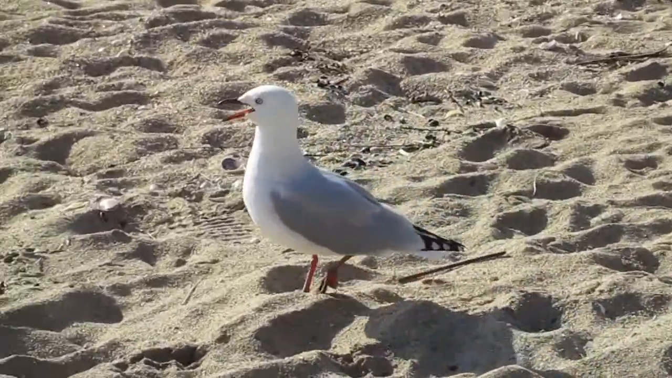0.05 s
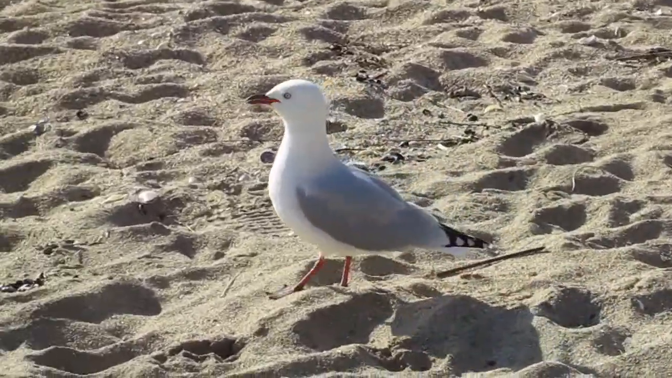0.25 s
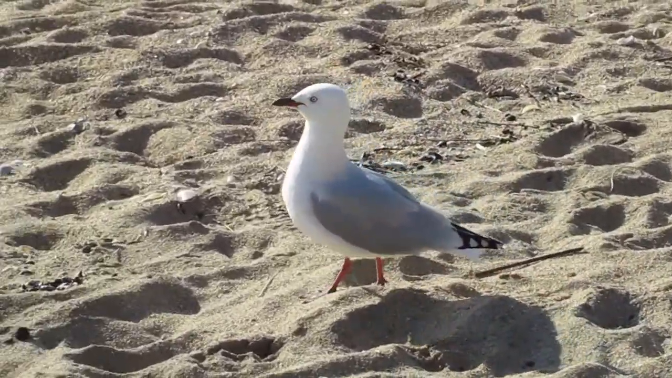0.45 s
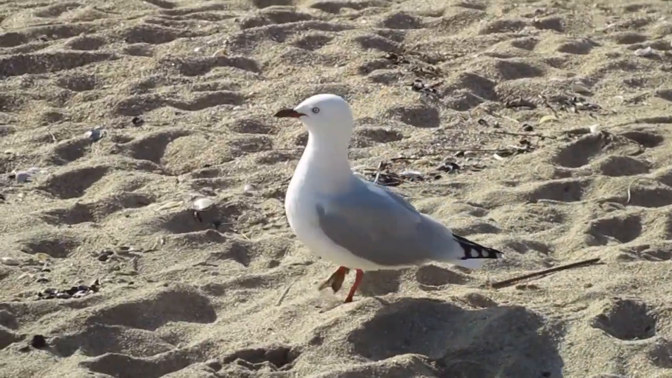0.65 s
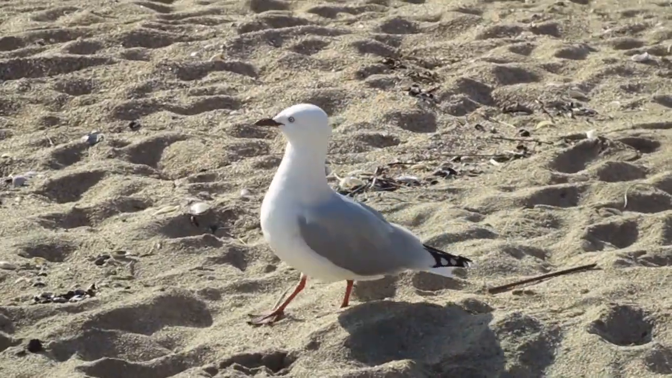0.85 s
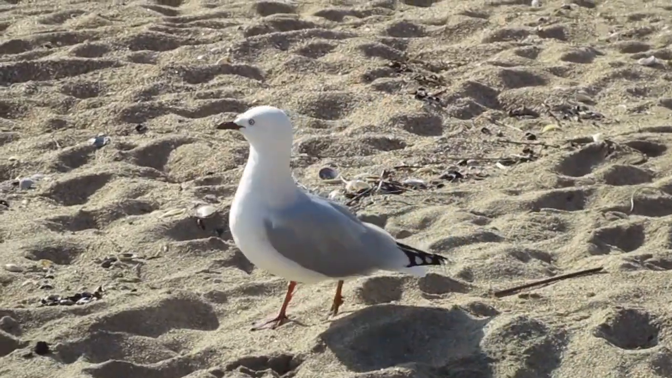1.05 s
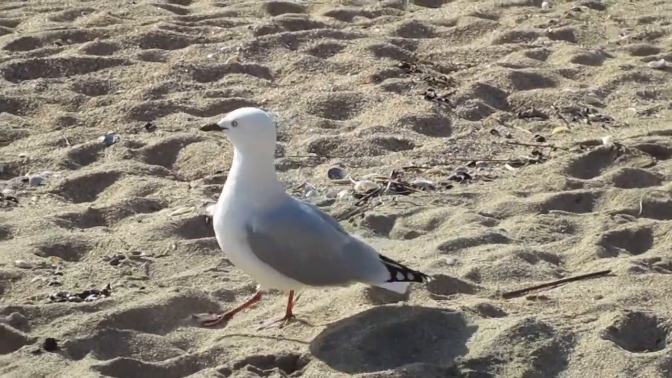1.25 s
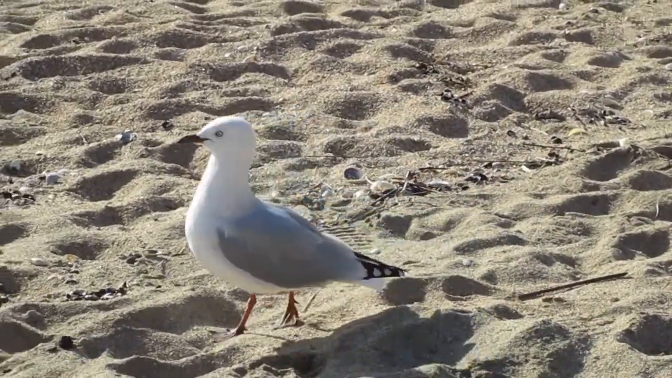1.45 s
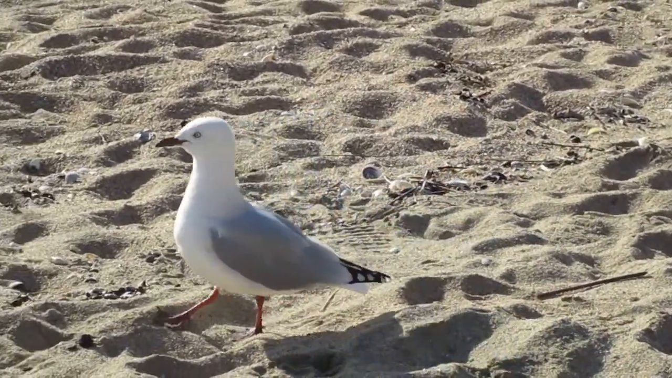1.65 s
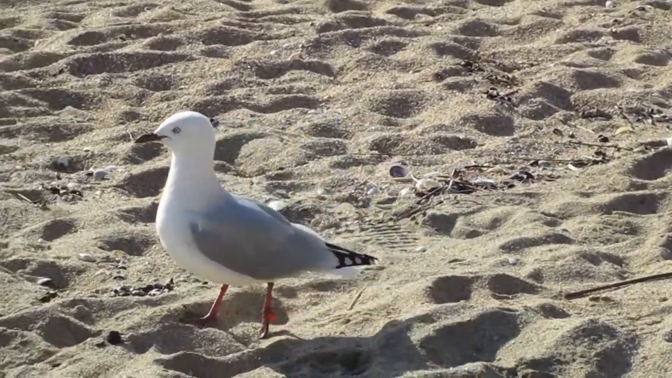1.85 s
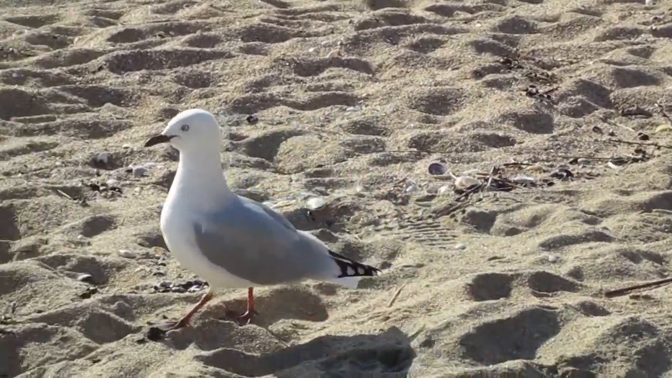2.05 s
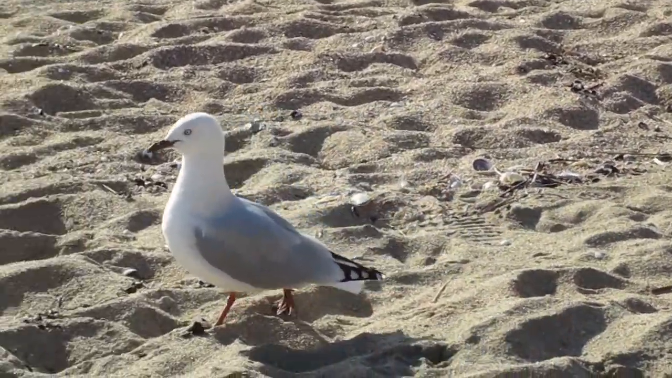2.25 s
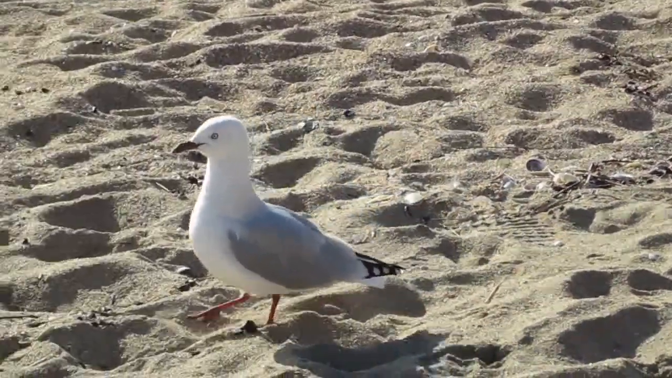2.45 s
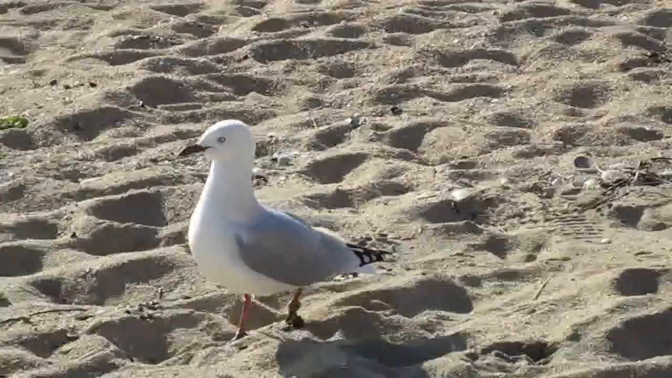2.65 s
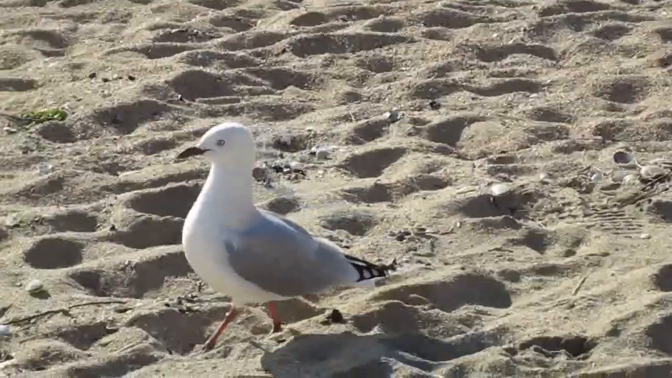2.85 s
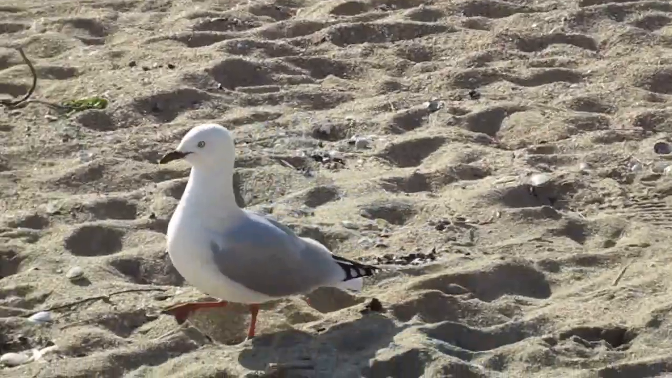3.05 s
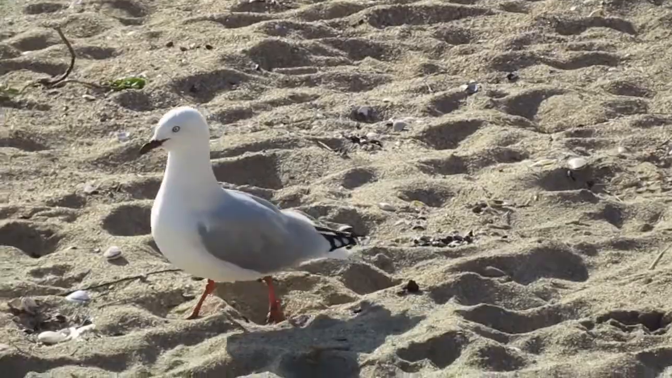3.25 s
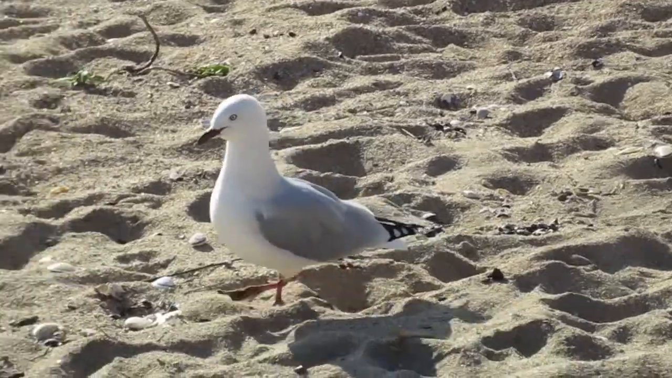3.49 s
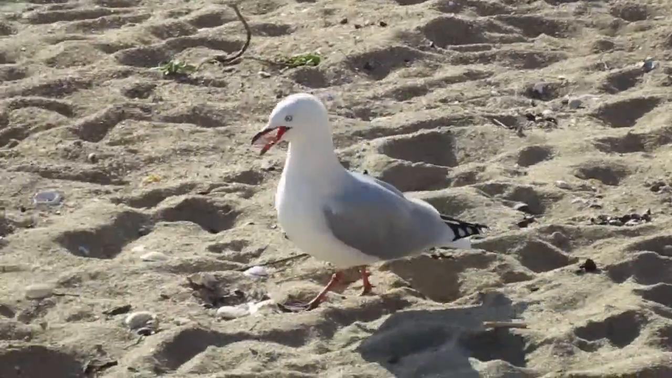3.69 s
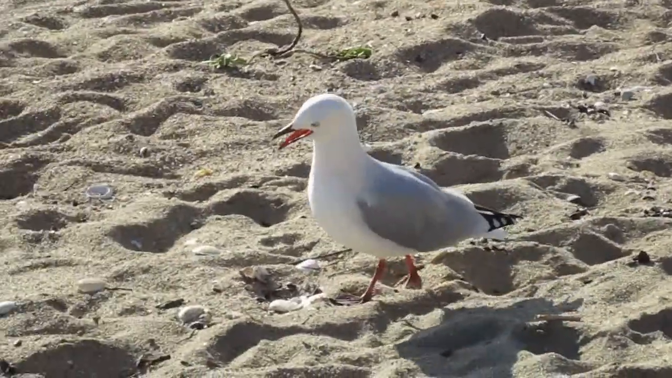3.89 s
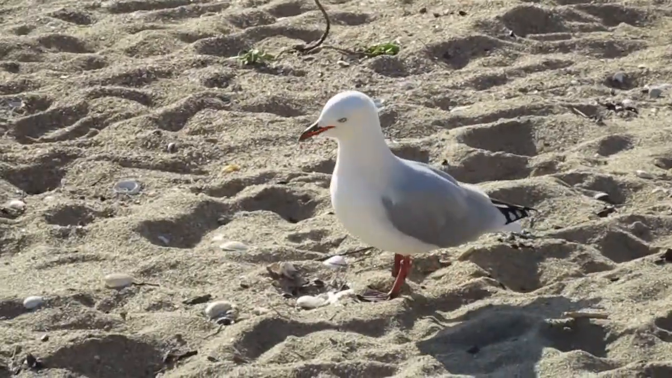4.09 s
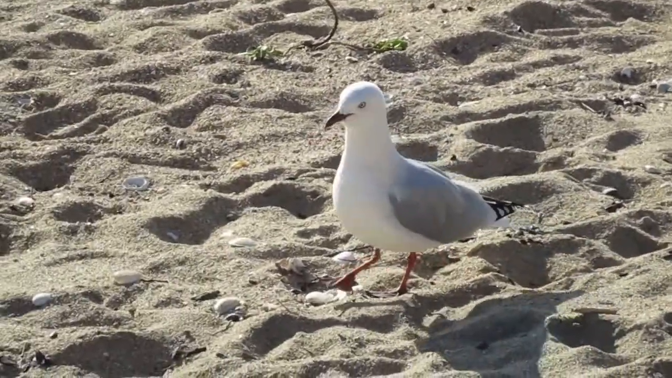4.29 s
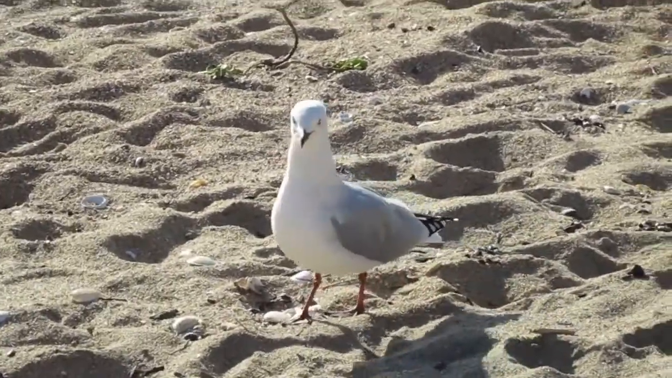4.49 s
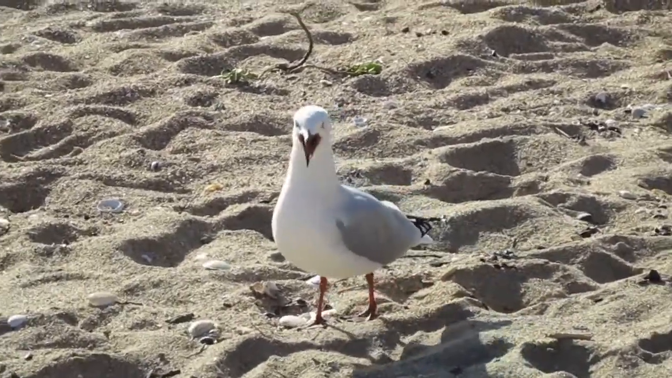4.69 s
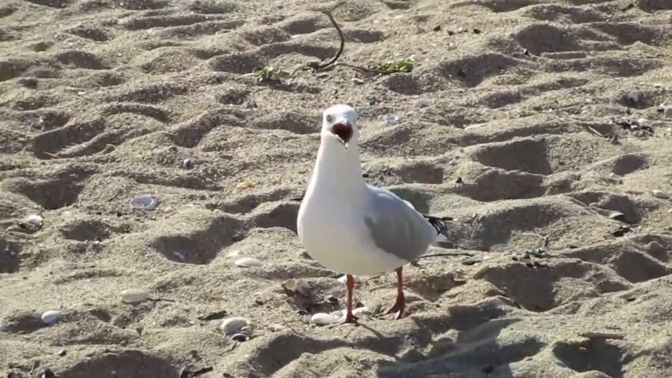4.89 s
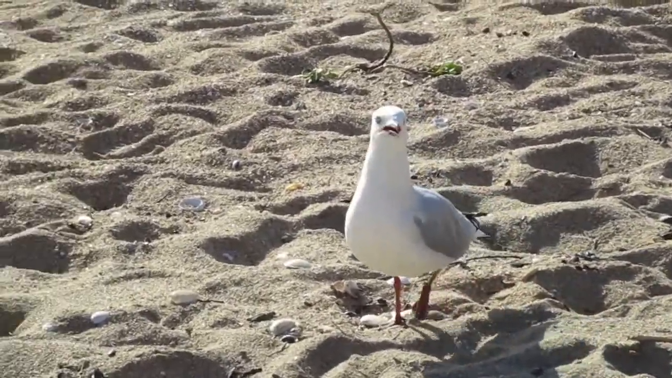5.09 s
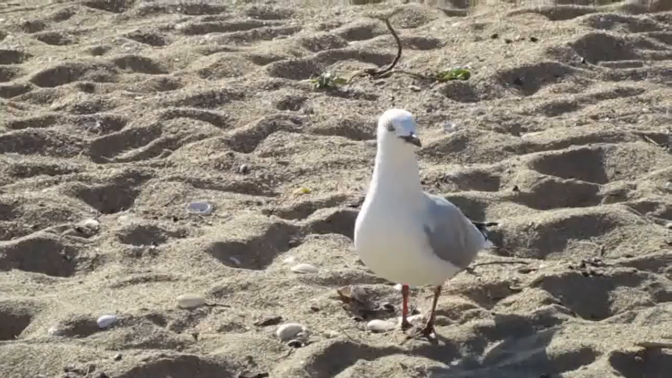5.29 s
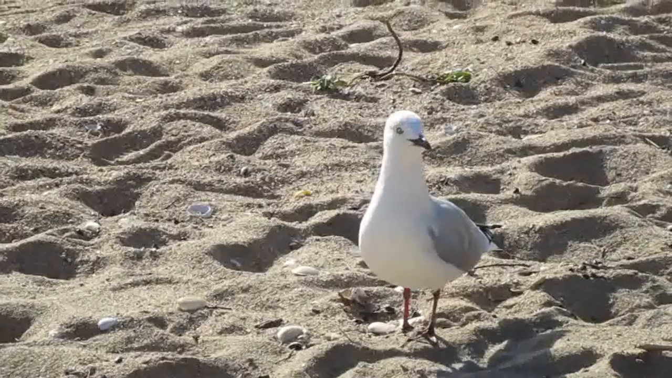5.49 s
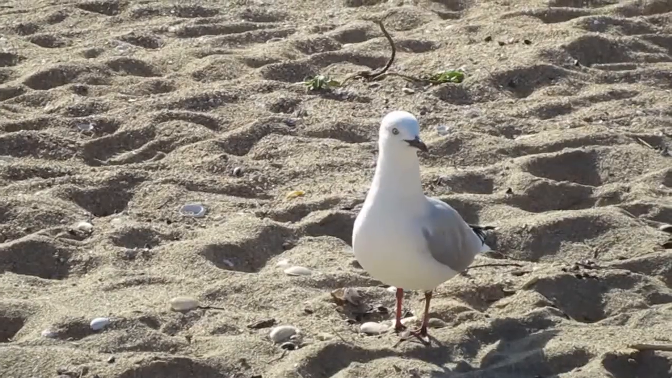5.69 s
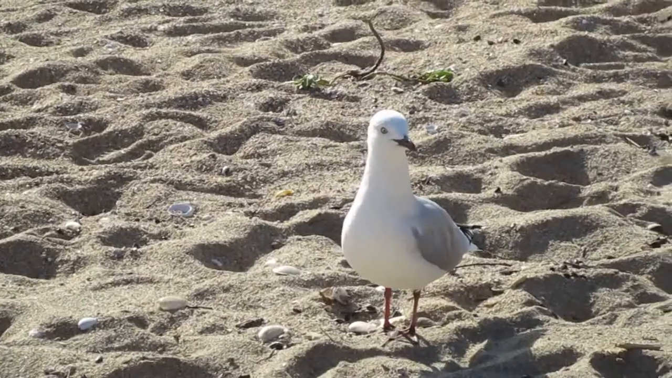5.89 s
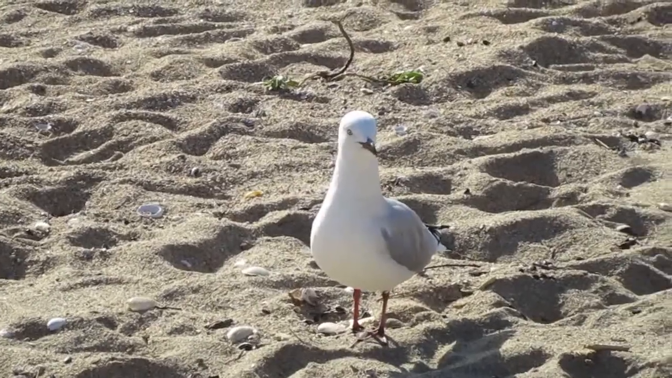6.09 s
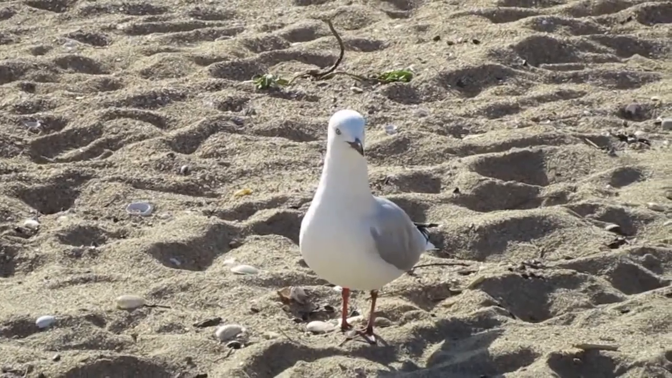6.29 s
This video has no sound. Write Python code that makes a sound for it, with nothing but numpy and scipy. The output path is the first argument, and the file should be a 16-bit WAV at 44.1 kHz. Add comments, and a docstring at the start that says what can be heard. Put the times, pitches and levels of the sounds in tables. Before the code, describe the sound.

Raspy gull calls, one early and a louder cluster later, over a steady shore hush, a faint distant gull cry and buffeting wind.

```python
"""A gull squawks and growls close by on a beach; another one cries far off.
Each near call is a rattle of about 65 bursts a second, each some ten syrinx pulses ringing through the throat.
The far cries are wavering stacks of sine overtones with one echo. Wind puffs on the microphone as lumpy
noise and single pressure swings, a lens motor ticks faintly in noise clicks, and a distant drone of
narrow noise lies over the filtered-noise wash of the shore."""
import sys
import numpy as np
from scipy import signal
from scipy.fft import rfft, irfft
from scipy.io import wavfile

SR = 44100
rng = np.random.default_rng(int(sys.argv[2]) if len(sys.argv) > 2 else 0)


def wav_out(sig):
    """Save sig, one row per channel (or a flat mono array), as 16-bit PCM at SR to the path in sys.argv[1]."""
    wavfile.write(sys.argv[1], SR, np.round(np.clip(np.atleast_2d(sig).T, -1, 1) * 32767).astype(np.int16))


N = 279594
TIME = np.arange(N) / SR


def from_db(db):
    """Decibels to gain."""
    return 10 ** (np.asarray(db) / 20)


def rms_one(x):
    """Scale to unit power."""
    return x / np.sqrt(np.mean(x ** 2) + 1e-20)


def ease(x):
    """Smooth step from 0 to 1."""
    x = np.clip(x, 0, 1)
    return (1 - np.cos(np.pi * x)) / 2


def read(rows, at):
    """Every column of a curve at the given times."""
    s, *columns = np.transpose(rows)
    return [np.interp(at, s, column) for column in columns]


def add(out, sound, s):
    """Mix a short sound in at a time."""
    start = int(np.clip(round(s * SR), 0, N))
    out[start:start + len(sound)] += sound[:N - start]


def response(colour, size):
    """Causal (minimum-phase) filter with the given spectrum, by folding its cepstrum."""
    hz, db = np.transpose(colour)
    bins = np.maximum(np.fft.rfftfreq(size, 1 / SR), 1)
    gain = from_db(np.interp(np.log(bins), np.log(hz), db))
    cepstrum = irfft(np.log(gain), size)
    cepstrum[1:size // 2] *= 2
    cepstrum[size // 2 + 1:] = 0
    return np.exp(rfft(cepstrum))


def noise(colour):
    """Coloured noise of unit power."""
    white = rng.standard_normal(N)
    return rms_one(irfft(rfft(white) * response(colour, size=N), N))


def narrow_noise(hz, width_hz):
    """Noise in one resonance; at 0 Hz a slow random drift."""
    bins = np.fft.rfftfreq(N, 1 / SR)
    resonance = 1 / (1 + ((bins - hz) / width_hz) ** 2)
    return rms_one(irfft(rfft(rng.standard_normal(N)) * resonance, N))


# Level curves before trim. Each row: time in seconds, shore level in dB, hiss level in dB.
SHORE_LEVELS = [(0,-43,-68),(.7,-43,-68),(1.4,-40,-65),(2.6,-39,-64),(4.5,-38.5,-64),(6.34,-39,-65)]
# Tone of the wash. Each row: frequency in Hz, relative density in dB per Hz.
WASH_COLOUR = [(100,-8.5),(250,-11),(450,-15),(620,-4.5),(850,-2.5),(1100,-0.5),(1330,-10.5),(1550,1),(1750,-4.5),(1950,-17),(2200,-24),(3000,-27),(6000,-40)]
# Tone of the low surf. Each row: frequency in Hz, relative density in dB per Hz.
LOW_SURF_COLOUR = [(120,-15),(300,0.5),(450,-5.5),(700,-15.5),(1500,-50)]


def shore(trim_db=-1.33, surf_db=-69.5, surf_db_per_s=3.5):
    """Gently wavering noise for the wash, over a low surf that slowly builds."""
    level_db = read(SHORE_LEVELS, TIME)[0]
    waver_db = 1.2 * narrow_noise(0, 6)
    wash = from_db(level_db + trim_db + waver_db) * noise(WASH_COLOUR)
    surf = from_db(surf_db + surf_db_per_s * TIME) * noise(LOW_SURF_COLOUR)
    return wash + surf


# Tone of the hiss. Each row: frequency in Hz, relative density in dB per Hz.
MICROPHONE_COLOUR = [(1500,6),(3000,0.5),(6000,1),(8000,-0.5),(9300,0),(11000,-6.5),(15000,-86.5)]


def microphone_noise(trim_db=4.5, whine_db=-76):
    """The microphone's hiss as coloured noise, its thin whine as a very narrow band."""
    level_db = read(SHORE_LEVELS, TIME)[1]
    hiss = from_db(level_db + trim_db) * noise(MICROPHONE_COLOUR)
    whine = from_db(whine_db) * narrow_noise(15734, 4)
    return hiss + whine


# Hums of the drone. Each row: frequency in Hz, half-width in Hz, level in dB.
DRONE_BANDS = [(1000.5,7.5,-54),(1474,26,-48)]


def far_drone():
    """Narrow noise bands that hum unsteadily."""
    return sum(from_db(db) * narrow_noise(hz, width_hz) for hz, width_hz, db in DRONE_BANDS)


# Runs of the motor. Each row: start in seconds, length in seconds, peak in dB before trim and spread.
MOTOR_RUNS = [(0.678, .09, -41), (1.166, .17, -39), (2.48, .05, -32.5), (2.65, .14, -36)]
# Tone of a tick. Each row: frequency in Hz, relative level in dB.
MOTOR_TICK_COLOUR = [(1500,-14),(3000,0),(5000,-2),(8000,-4),(10000,-20),(15000,-30)]


def lens_ticks(trim_db=-6, spread_db=5, step_s=0.019, decay_s=.0008, size=512):
    """Tiny dry clicks of uneven strength, one for each step of the motor."""
    out = np.zeros(N)
    tick_filter = response(MOTOR_TICK_COLOUR, size=size)
    for start, length, peak_db in MOTOR_RUNS:
        for s in np.arange(start, start + length, step_s):
            snap = rng.standard_normal(size) * np.exp(-TIME[:size] / decay_s)
            tick = irfft(rfft(snap) * tick_filter)
            level_db = peak_db + trim_db + spread_db * rng.standard_normal()
            add(out, tick / abs(tick).max() * from_db(level_db), s)
    return out


# Gusts. Each row: middle in seconds, level in dB, half length in seconds.
WIND_GUSTS = [(1.142, -45.5, 0.28), (1.88, -38, 0.15), (2.804, -28, 0.15), (3.332, -31, 0.032),
              (3.735, -32.5, 0.11), (3.9, -29.5, 0.13), (4.377, -21.5, 0.11), (4.537, -13.5, 0.067),
              (4.74, -29, 0.087), (5.585, -26.5, 0.14), (5.842, -29, 0.071), (6.124, -30.5, 0.048)]
# Strongest eddies on the microphone. Each row: middle in seconds, peak in dB before trim, frequency in Hz.
WIND_EDDIES = [(1.891, -28.5, 64), (2.722, -19, 72.4), (2.812, -18, 81), (3.742, -19, 55.6),
               (4.299, -14.5, 128), (4.358, -14.5, 175), (4.4, -9.5, 120), (4.441, -14.5, 78),
               (4.543, -9, 150), (4.566, -12.5, 83.5), (4.668, -17, 82), (5.585, -11, 71)]
# Tone of the turbulence. Each row: frequency in Hz, relative density in dB per Hz.
TURBULENCE_COLOUR = [(20,-10),(50,3.5),(90,-5),(160,-12),(260,-28),(400,-25.5),(700,-74.5)]


def wind(breeze_db=-58.5, breeze_db_per_s=3, puff_db=6.5, lumpy_db=4.5, puff_cycles=0.27, size=4096):
    """Lumpy turbulence swelling with each gust, and single eddies swinging the pressure about once."""
    gusts = sum(from_db(db) / np.cosh(2 * (TIME - s) / half_s) for s, db, half_s in WIND_GUSTS)
    # between gusts a breeze freshens
    breeze = from_db(breeze_db + breeze_db_per_s * TIME)
    lumps = from_db(lumpy_db * narrow_noise(0, 16.7))
    out = np.hypot(breeze, gusts) * rms_one(noise(TURBULENCE_COLOUR) * lumps)
    middle = TIME[size // 2]
    phases = rng.uniform(0, 2 * np.pi, len(WIND_EDDIES))
    for (s, peak_db, hz), phase in zip(WIND_EDDIES, phases):
        cycles = (TIME[:size] - middle) * hz
        swell = from_db(peak_db + puff_db) / np.cosh(cycles / puff_cycles * np.pi / 2)
        add(out, swell * np.sin(2 * np.pi * cycles + phase), s - middle)
    return signal.sosfilt(signal.butter(2, 16, "high", fs=SR, output="sos"), out)


def far_cry(curve, overtones, trim_db, echo_db=-12, echo_s=0.042):
    """A clear distant note: sine overtones on one wavering pitch, with one echo."""
    pitch_hz, level_db = read(curve, TIME)
    waver = 1 + 0.0052 * narrow_noise(0, 41)
    phase = 2 * np.pi * np.cumsum(pitch_hz * waver) / SR
    first_s, last_s = curve[0][0], curve[-1][0] + .01
    gate = np.clip(np.minimum(TIME - first_s, last_s - TIME) / 0.013, 0, 1)
    tone = sum(from_db(db) * np.sin(round(k) * phase) for k, db in overtones)
    note = np.sqrt(2) * gate * from_db(level_db + trim_db) * tone
    return note + from_db(echo_db) * np.interp(TIME - echo_s, TIME, note)


# The far cry. Each row: time in seconds, mean pitch in Hz, level in dB before trim.
DISTANT_CRY = [(1.0, 974, -55), (1.04, 940, -45), (1.072, 1032, -53), (1.16, 1156, -35.5),
               (1.23, 1170, -32.5), (1.27, 1181, -39.5), (1.32, 1152, -43)]
# Its overtones. Each row: multiple of the pitch, relative level in dB.
DISTANT_OVERTONES = [(1,1.5),(2,-9),(3,-19),(4,-34),(5,-28)]
# The far yelp. Each row: time in seconds, mean pitch in Hz, level in dB before trim.
DISTANT_YELP = [(1.06,1683,-56),(1.08,1660,-35.5),(1.11,1633,-36.5),(1.135,1610,-58)]


def far_gull():
    """A cry rich in overtones and a higher yelp of one pure tone."""
    cry = far_cry(DISTANT_CRY, DISTANT_OVERTONES, trim_db=-5.5)
    yelp = far_cry(DISTANT_YELP, [(1, 0)], trim_db=-0.5)
    return cry + yelp


def scatter(x, wet_db, t60, size=16384):
    """Diffuse, dull reflections from the beach: a decaying noise tail."""
    t = TIME[:size]
    tail = rng.standard_normal(size) * from_db(-60 * t / t60) * (t > .002)
    tail = signal.sosfilt(signal.butter(1, 4000, fs=SR, output="sos"), tail)
    return from_db(wet_db) * signal.fftconvolve(x, tail / np.linalg.norm(tail))[:N]


def burst_times(t, per_s):
    """A burst starts each time the rattle completes a cycle."""
    cycles = np.cumsum(per_s) / SR
    return np.interp(np.arange(int(cycles[-1]) + 1), cycles, t)


def burst(shape, pitch_hz, stretch, rough, size, count=16, lock_s=0.0032, blunt=0.78):
    """Spectrum of one train of syrinx pulses, which start unevenly and then lock to the pitch."""
    nominal = np.arange(count) / pitch_hz
    jitter = rough * (1 + 11 * np.exp(-nominal / .0012))
    uneven = np.clip(1 + jitter * rng.standard_normal(count), .5, 1.6)
    periods = uneven / (pitch_hz * read(shape, nominal / stretch)[1])
    at = np.cumsum(periods) - periods
    strength_db = read(shape, at / stretch)[0] + .5 * rng.standard_normal(count)
    strength = from_db(strength_db) * (at < shape[-1][0] * stretch)
    hz, t = np.fft.rfftfreq(size, 1 / SR), TIME[:size]
    # the first pulses are blunt; the syrinx snaps sharply only once it has locked
    treble = hz ** 4 / (hz ** 4 + 4500 ** 4)
    sharpness = 1 - blunt * np.outer(treble, np.exp(-(at / lock_s) ** 4))
    pulses = (sharpness * np.exp(-2j * np.pi * np.outer(hz, at))) @ strength
    # air rushes through while the syrinx is open, mostly heard in the treble
    flow = from_db(read(shape, t / stretch)[0]) * (t < shape[-1][0])
    rush = rng.standard_normal(size) * flow * np.sqrt(pitch_hz / SR)
    air = .02 + min(3 * rough, .12)
    return pulses + air * rfft(rush) * (1 + (hz / 4500) ** 2)


def call(row, rough, arch, shape, throat, onset_rough, rise_follow=0.12, fall_follow=1.1,
         sag_rough=4.35, size=1024):
    """A rattle whose pitch, rate and level follow the effort; fading, the throat sinks and the voice breaks up."""
    (start, length, rise_s, settle_s, fall_s, top_hz, top_per_s, level_db,
     attack_db, swell_db, treble_db, edge_db, nasal_db, chest_db) = row
    out, hz = np.zeros(N), np.fft.rfftfreq(size, 1 / SR)
    treble = hz > 4000
    opening = np.clip((hz - 2400) / 1900, 0, 1)
    # each call has its own weight of fundamental, nasal band and top edge
    colour = from_db(np.interp(hz, [1200, 2000, 2600, 3400, 4400, 7000, 9000],
                               [chest_db, 0, 0, nasal_db, 0, 0, edge_db]))
    t, fall_start = TIME[TIME < length], length - fall_s
    slow = np.clip(1 - t / rise_s, 0, 1) ** 2
    slack = np.clip(1 - t / settle_s, 0, 1) ** 2
    spent = np.clip((t - fall_start) / fall_s, 0, 1)
    bowed = 1 - arch["bow"] * (2 * t / length - 1) ** 2
    rate = top_per_s * (1 - arch["slow_start"] * slow - arch["slow_end"] * spent ** 2)
    release_db = arch["release_db"] * spent ** arch["release_curve"]
    loudness = level_db + swell_db * (t - length / 2) - attack_db * slack - release_db
    closing = ease((t - fall_start + arch["close_lead_s"]) / arch["close_s"])
    beak = treble_db - arch["close_db"] * closing
    for s in burst_times(t, rate):
        i = int(s * SR)
        scoop = arch["scoop"] * slack[i]
        sag = arch["sag"] * ease(spent[i] ** arch["sag_delay"])
        # the lower throat resonances follow the pitch down
        sink = 1 - rise_follow * scoop - fall_follow * sag
        tract = response([(f * sink if f < 4700 else f, db) for f, db in throat], size=size)
        # slower rattles hold the syrinx open for longer
        stretch = (68 / rate[i]) ** .6 * (1 + (.02 + 2 * rough) * rng.standard_normal())
        harshness = rough + onset_rough * slack[i] + sag_rough * sag ** 3
        pitch_hz = top_hz * (bowed[i] - scoop - sag)
        spectrum = tract * colour * burst(shape, pitch_hz, stretch, harshness, size=size)
        # the beak opening sets the share of treble
        share = np.sum(abs(spectrum * treble) ** 2) / np.sum(abs(spectrum) ** 2)
        spectrum = spectrum * (from_db(beak[i]) / np.sqrt(share)) ** opening
        # bursts start between samples, so the rattle stays even
        offset_s = start + s - round((start + s) * SR) / SR
        sound = rms_one(irfft(spectrum * np.exp(-2j * np.pi * hz * offset_s)))
        # spread unit power over one rattle cycle
        add(out, sound * np.sqrt(SR / rate[i] / size) * from_db(loudness[i]), start + s)
    return out


# Arched squawks. Each row: start, length, rattle rise, voice settling and fall in seconds, top pitch in Hz,
# top bursts per second, level in dB, attack depth in dB, swell in dB per second, starting treble share in dB,
# then trims in dB for top edge, nasal band and fundamental.
SQUAWK_CALLS = [(0.0552, 0.39, 0.17, 0.14, .165, 1101, 68.7, -29.5, 4.5, 19, -8.5, 8, 6, 4.5),
                (2.8475, 0.45, 0.27, .15, 0.2, 1099, 68.17, -19, 15.5, -8.5, -9.5, 3.5, 12.5, -0.5),
                (4.1083, .405, .208, 0.075, 0.17, 1098, 71.3, -19, 6.5, 2.5, -11, 5, 9, -1.5),
                (5.008, .38, .1, 0.19, .14, 1137, 71, -20.5, 4.5, 0, -15, -0.5, 10.5, -1.2)]
# Lower, flatter growls. Each row: the same columns as the squawks.
GROWL_CALLS = [(.002, 0.16, 0.0039, .004, 0.14, 985, 72.6, -43.5, 1.1, 28, -12, 10, 4, 17),
               (3.69, 0.074, .02, .02, 0.0063, 897, 77.4, -38, 1.5, 88, -14.5, 1, 4, -22),
               (3.78, 0.3, .036, 0.035, 0.16, 1004, 66.04, -23, 3.5, 6, -10.5, -4.5, 4.3, 11),
               (4.646, .445, .275, 0.11, .19, 1009, 73.4, -19.5, 8, 7.5, -8.5, 1.5, 1.9, 9)]
# How a squawk starts slack and ends spent. By key: shares of pitch lost at the start (scoop), over the whole
# arch (bow) and at the end (sag); shares of burst rate lost (slow_start, slow_end); exponents that delay the
# sag and the release; level lost and treble lost as the beak closes, in dB; closing lead and time in seconds.
SQUAWK_EFFORT = dict(scoop=0.109, bow=0.039, sag=0.291, slow_start=.16, slow_end=.33, sag_delay=1.19, release_db=13.5, release_curve=2.405, close_db=18.5, close_lead_s=0.052, close_s=0.21)
# The same for a growl, with the same keys.
GROWL_EFFORT = dict(scoop=0.035, bow=0.076, sag=0.05, slow_start=.29, slow_end=.19, sag_delay=0.85, release_db=8.5, release_curve=1.3, close_db=17, close_lead_s=0.0093, close_s=0.26)
# One squawk burst. Each row: seconds from its start before stretch, relative pulse strength in dB, pitch ratio.
SQUAWK_PULSES = [(0,-4,1.16),(.0012,-4,1.05),(.003,0,1.003),(.006,-.5,1),(.008,-3,.998),(.0095,-15,.99),(.012,-30,.98)]
# One growl burst. Each row: seconds from its start before stretch, relative pulse strength in dB, pitch ratio.
GROWL_PULSES = [(0,3.5,.83),(.001,4.5,.87),(.0022,4,.96),(.0035,6,1),(.005,4,1.005),(.007,0,1.015),(.009,-12,1.03),(.012,-40,1.03)]
# Squawking throat and beak. Each row: frequency in Hz before the throat sinks, relative level in dB.
SQUAWK_TRACT = [(300,-25),(600,0),(1100,-11),(1600,6),(2200,4.5),(2750,-3),(3450,-13),(4300,-14.5),(5500,-18),(7300,-23.5),(8100,-41),(9000,-40),(12000,-41.5),(15500,-64)]
# Growling throat and beak. Each row: frequency in Hz before the throat sinks, relative level in dB.
GROWL_TRACT = [(300,-53),(600,-16.5),(1000,-22),(1400,-14),(2100,-5),(2850,3),(3400,-7),(4050,-9.5),(5250,-20),(5750,-17.5),(7200,-24),(8000,-28.5),(11500,-30.5),(15500,-47)]
# Unevenness of the settled syrinx pulses. One value per squawk: share of a period.
SQUAWK_JITTER = (.004, .005, .003, .013)
# The same for the growls. One value per growl: share of a period.
GROWL_JITTER = (.004, .05, .003, .005)


def near_gull():
    """Four syrinx-and-throat squawks, three of them led in by growls."""
    squawks = sum(call(row, rough, SQUAWK_EFFORT, SQUAWK_PULSES, SQUAWK_TRACT, onset_rough=.05)
                  for row, rough in zip(SQUAWK_CALLS, SQUAWK_JITTER))
    growls = sum(call(row, rough, GROWL_EFFORT, GROWL_PULSES, GROWL_TRACT, onset_rough=0.0117)
                 for row, rough in zip(GROWL_CALLS, GROWL_JITTER))
    return squawks + growls


def scene():
    """Everything at one microphone."""
    background = shore() + microphone_noise() + far_drone()
    gull = near_gull()
    beach = scatter(gull, wet_db=-24, t60=.04) + scatter(gull, wet_db=-31, t60=.25)
    return (background + lens_ticks() + wind() + far_gull() + beach + gull)[None]


def record(dry):
    """The top is cut steeply above 16 kHz."""
    return signal.sosfilt(signal.ellip(10, .2, 80, 16000, fs=SR, output="sos"), dry)


dry = scene()
out = record(dry)
wav_out(out)
```